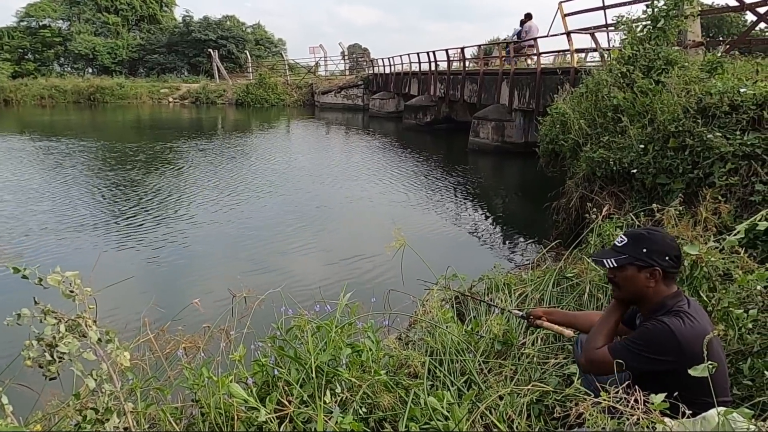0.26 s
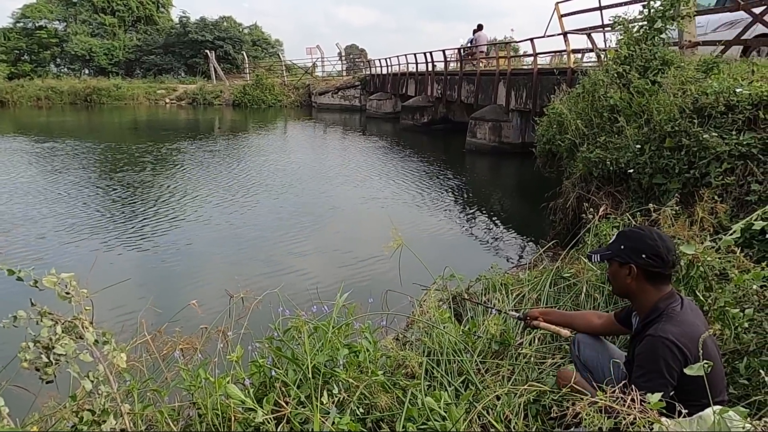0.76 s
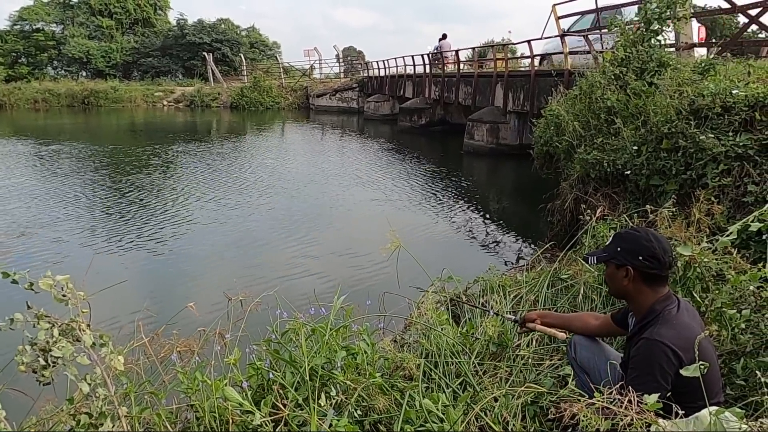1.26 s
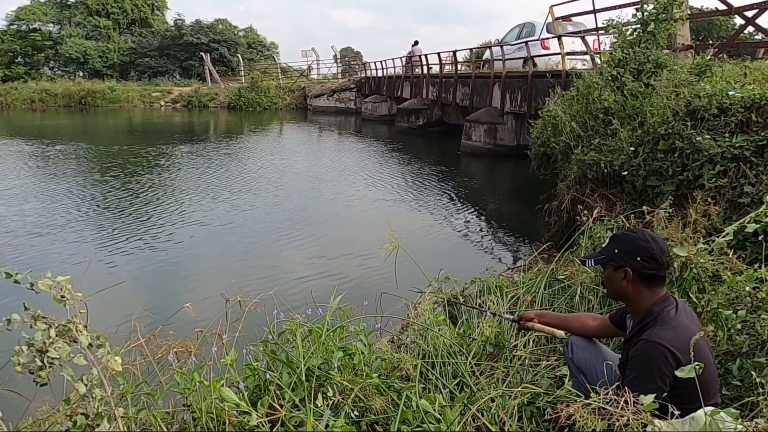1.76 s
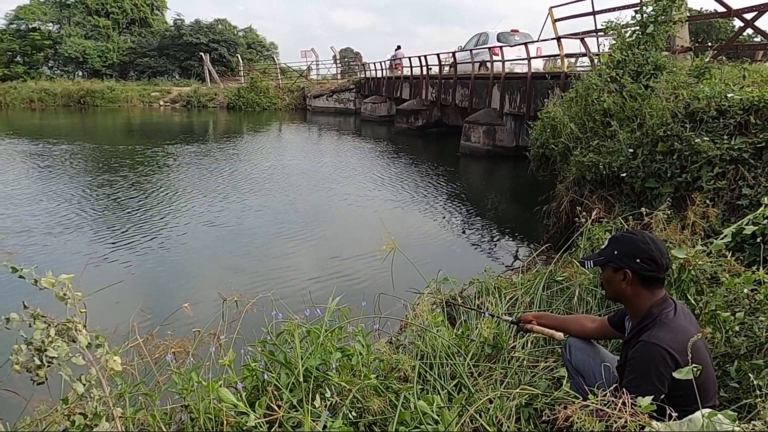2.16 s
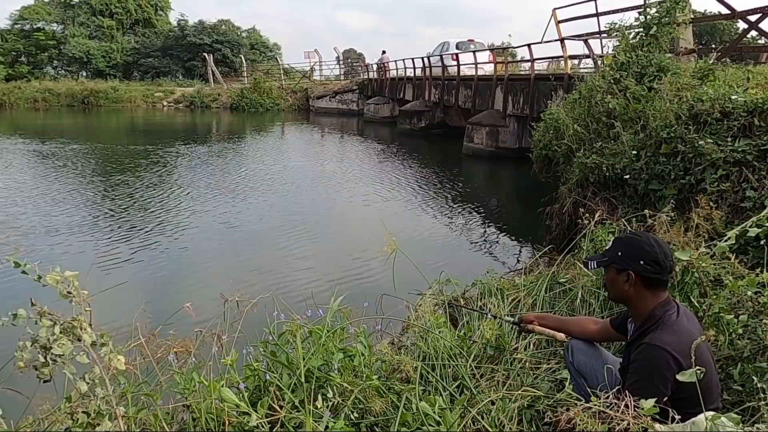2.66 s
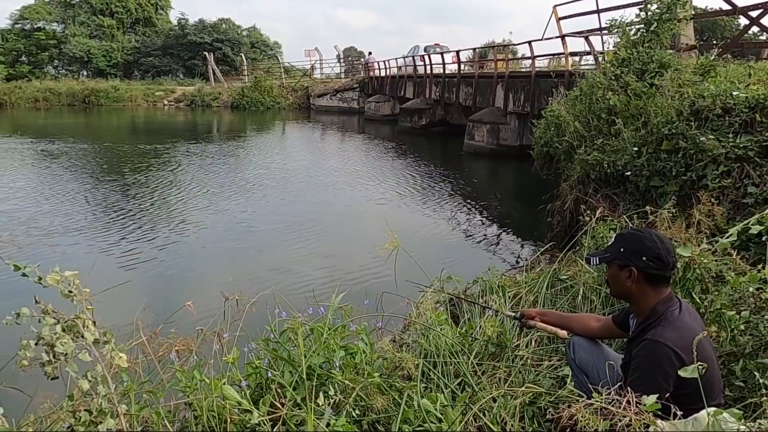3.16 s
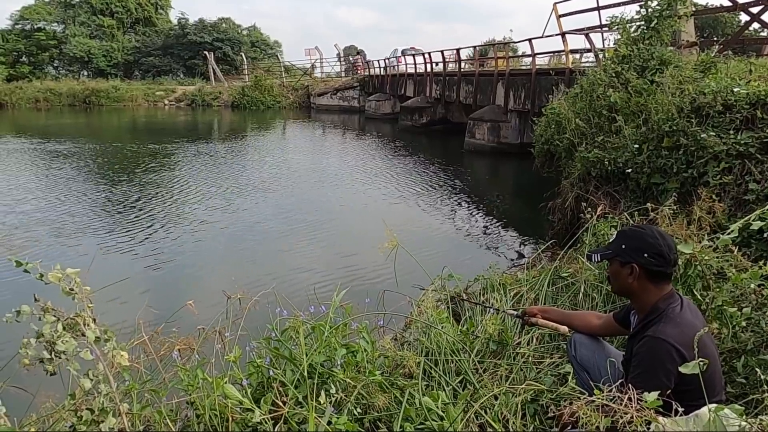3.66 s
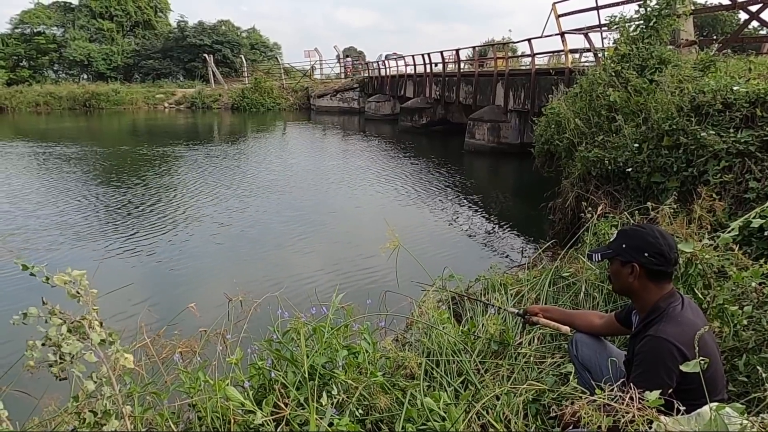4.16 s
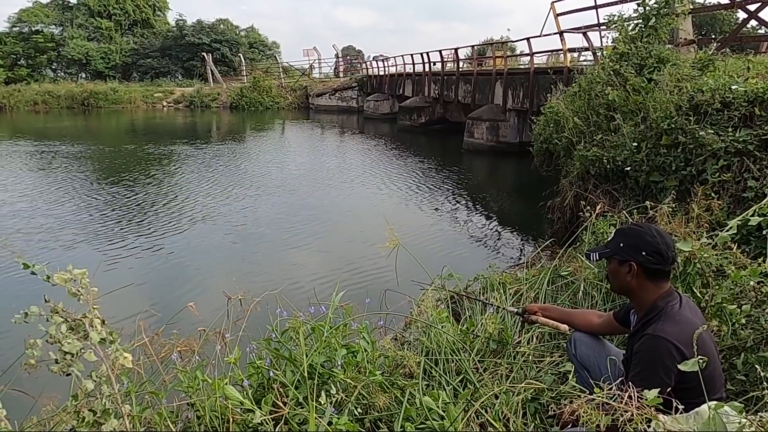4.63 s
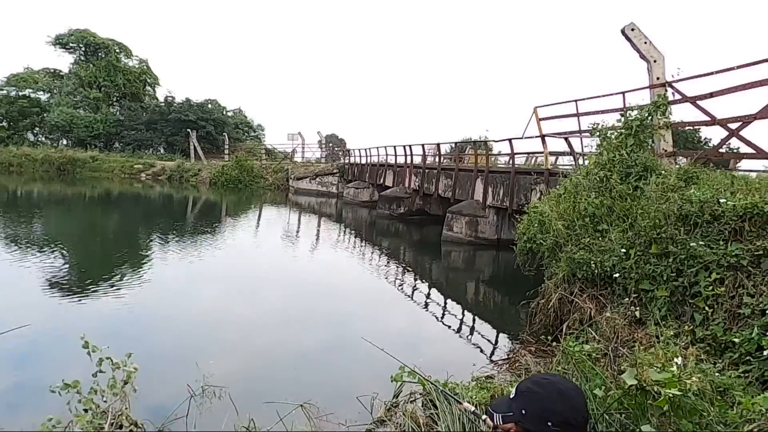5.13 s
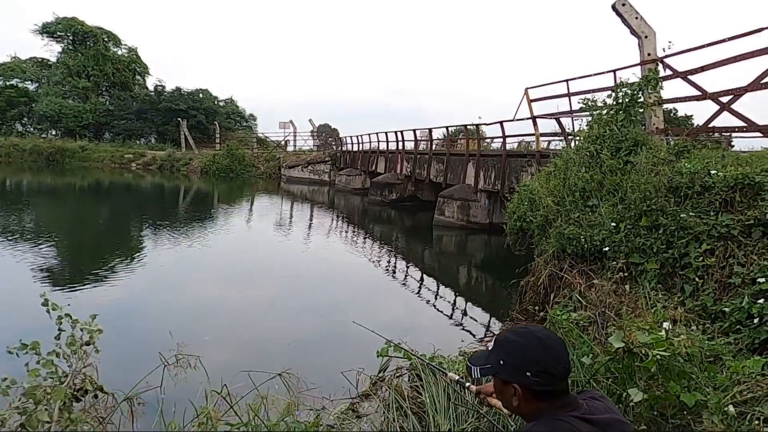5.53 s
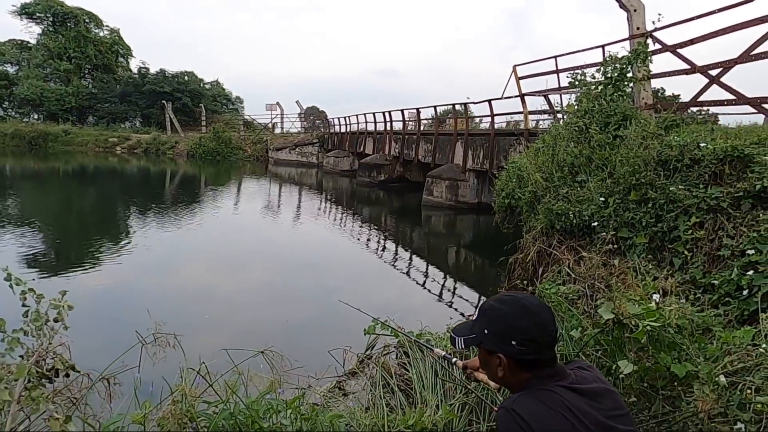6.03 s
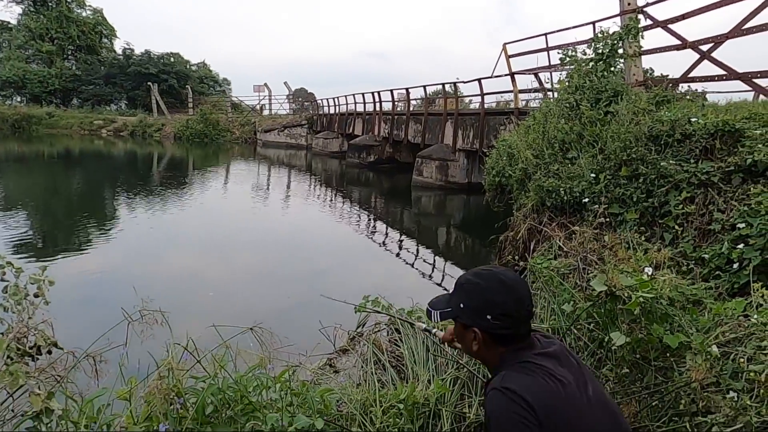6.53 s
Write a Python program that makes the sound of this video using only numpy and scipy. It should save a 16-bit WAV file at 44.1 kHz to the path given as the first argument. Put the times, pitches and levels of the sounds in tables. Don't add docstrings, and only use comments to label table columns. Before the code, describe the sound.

A car revs and drives off over a bridge with tyre roar and wind buffeting, brief silence, then a motorcycle putters past amid insects.

```python
import sys
import numpy as np
from scipy import signal
from scipy.fft import rfft, irfft, next_fast_len
from scipy.io import wavfile
from scipy.ndimage import uniform_filter1d

SR = 44100
rng = np.random.default_rng(int(sys.argv[2]) if len(sys.argv) > 2 else 0)


def master(y):
    cut = np.clip(np.atleast_2d(y).T, -1, 1)
    pcm = np.round(cut * 32767)
    wavfile.write(sys.argv[1], SR, pcm.astype(np.int16))


def linear_from_db(decibels):
    return 10 ** (np.asarray(decibels, float) / 20)


N = 299439
T = np.arange(N) / SR
CUT_S, BACK_S, FADE_IN_S = 4.9805, 5.185, 0.066

# time in seconds, firing rate in Hz, load in dB.
CAR_ENGINE = [(0, 27.76, -34), (.5, 28.19, -32), (1.26, 28.63, -34), (1.35, 37.3, -29.5), (1.5, 40.84, -28),
              (1.77, 42.94, -23.5), (2.28, 44.33, -23.5), (2.44, 42.07, -32.5), (2.62, 39.42, -31.5),
              (2.8, 39.2, -34.5), (3.07, 39.25, -32), (3.61, 42.12, -31), (4.3, 44.48, -32.5),
              (4.66, 46.01, -36), (4.97, 45.05, -33)]
# frequency in Hz, gain in dB.
EXHAUST_RESPONSE = [(28, -4.5), (43, -0.5), (56, -5), (85, -3.5), (130, -24)]
DULLING_DB_PER_S = -0.52

DIESEL_HZ = 26.04
# level in dB, start of receding in seconds, slope in dB per second.
DIESEL_FADE = (-38, 1.21, -3.5)
# multiple of the firing rate, level in dB.
DIESEL_MULTIPLES = [(2, -1.5), (4, -4), (5, -5.5), (6, -2.5), (7, -8), (8, -16), (9, -17.5)]

# time in seconds, roar in dB, distance from 0 to 1, port spread from 0 to 1.
ROAD_PASS = [(0, -47.5, 0.01, 0), (1.2, -49, 0.24, 0.08), (2, -47, 0.55, .16), (2.6, -48.5, 0.7, .17),
             (3.2, -49, 0.9, 0.19), (4.3, -51.5, 0.75, 0.2), (4.62, -51.5, 0.78, 0.1),
             (4.97, -53, 0.6, 0.02)]
# frequency in Hz, density in dB per Hz.
NEAR_ROAR = [(140, -33), (230, -10.5), (330, -10.5), (460, -3.5), (700, -10), (1050, -9.5), (1350, -12.5),
             (1700, -15), (2000, -20), (4080, -24), (7400, -39), (8800, -34), (10000, -46.5), (16000, -75)]
# frequency in Hz, density in dB per Hz.
FAR_ROAR = [(200, -10.5), (330, -22), (470, 3), (600, -8), (760, -22), (1020, 1), (1270, -14), (1610, -7),
            (1880, -17), (2250, -13), (3000, -20.5), (5000, -29.5), (7200, -42), (9500, -45)]
# frequency in Hz, factor on the spread.
ROAR_WIDTH = [(60, .3), (500, 0.54), (1500, 1.3), (5000, 2.3), (10000, 7.6)]
PORT_LAG_S = 1e-4
# frequency in Hz, density in dB per Hz.
BODY_RUMBLE = [(15, -24), (30, -0.5), (70, 1), (150, -3.5), (220, -9.5), (300, -19), (500, -53)]
RUMBLE_NEAR_DB, RUMBLE_FAR_DB, RUMBLE_GONE_S = -31.5, -41, 0.49
# time on the deck in seconds, half width in seconds, level there in dB, level elsewhere in dB.
TREAD_HUM = (2.9, .55, -55, -68)

# frequency in Hz, density in dB per Hz.
PORT_HISS = [(8000, -40.5), (9800, -2.5), (11000, -3.5), (12500, 4.5), (14000, -1), (15500, -10),
             (16500, -45)]
# start in dB, slope in dB per second.
HISS_FADE = (-84.5, -6.5)
# frequency in Hz, width in Hz, level in dB.
ELECTRONIC_WHINE = (12290, 50, -96)

# centre in seconds, half width in seconds, buffeting in dB, flutter relative to it in dB.
GUSTS = [(.77, 0.069, -56, -32.5), (1.28, 0.052, -55, -27), (1.87, 0.3, -44.5, -24),
         (2.43, 0.024, -31, -19), (2.56, .04, -30, -26), (2.68, 0.074, -42, -24), (2.88, 0.071, -32, -10),
         (3.2, 0.29, -49.5, -16), (3.6, 0.097, -28, -13.5), (3.85, .15, -35, -24), (4.15, 0.19, -38, -25.5),
         (4.38, 0.049, -22.5, 3.5), (4.51, .07, -24.5, -4.5), (4.95, 0.082, -33, -16)]
# frequency in Hz, density in dB per Hz.
BUFFET_COLOUR = [(12, -1), (30, 3.5), (70, 4.5), (140, -10.5), (250, -21.5), (500, -75.5)]
# frequency in Hz, density in dB per Hz.
FLUTTER_COLOUR = [(80, -26), (170, 9.5), (280, -6), (450, -11.5), (800, -29.5), (1300, -50), (2500, -86)]
FLUTTER_LEFT_DB = -24
# time in seconds, peak in dB, pitch in Hz, cycles, port (0 left, 1 right).
EDDIES = [(4.322, -12.5, 75, 0.54, 0), (4.364, -13, 90.52, 0.75, 0), (4.338, -24, 716, 1.7, 1),
          (4.339, -10.5, 338, 1, 1), (4.344, -8.5, 55, 1.4, 1), (4.362, -15, 148, 1.1, 1),
          (4.368, -10.5, 65, 1.3, 1), (4.38, -8.5, 286, 3.9, 1), (4.384, -26.5, 740, 5, 1),
          (4.392, -17, 494, 2.7, 1), (4.402, -17, 201, 2.9, 1), (4.421, -15, 120, 1.7, 1),
          (4.444, -28.5, 290, 4.4, 1), (4.473, -22, 270, 5.8, 1), (4.496, -9, 197, 0.84, 1),
          (4.5, -28, 505, 2.1, 1), (4.541, -17, 250, 1.1, 1), (4.559, -16.5, 91.95, 1.4, 1),
          (4.958, -26, 130, 4.7, 0), (4.957, -27, 128.6, 6.3, 1)]

# time in seconds, peak in dB, crack in Hz, tube ring in dB, tube ring in Hz.
ROD_KNOCKS = [(4.586, -45.5, 3600, -70, 2290), (5.232, -43, 4500, -69, 2300), (5.253, -50, 4000, -66, 2300),
              (5.2645, -65, 1500, -35, 690), (5.2702, -36.5, 3800, -31, 683), (5.282, -46, 3500, -39, 2340),
              (5.2865, -33, 4800, -27, 818), (5.295, -45, 3900, -70, 2300), (5.3344, -31, 3800, -33, 2245),
              (6.6575, -39, 4800, -70, 2290), (6.713, -52.5, 4200, -62, 1800),
              (6.726, -51.5, 11000, -50, 1750), (6.745, -58.5, 1500, -52, 1200),
              (6.76, -53, 8500, -54, 1300), (6.78, -60, 5000, -50, 2380)]
# centre in seconds, half width in seconds, level in dB.
GRASS_RUSTLES = [
    (5.24, .02, -58),
    (5.28, .015, -46),
    (5.315, .02, -58),
    (5.339, .009, -43.5),
    (6.675, .018, -58),
    (6.725, .035, -54.5),
    (6.765, .022, -55),
]
# frequency in Hz, density in dB per Hz.
GRASS_COLOUR = [(600, -20), (1500, 8.5), (2500, 3.5), (4500, 0.5), (8000, -10.5), (11000, -17),
                (15000, -29.5)]
# centre in seconds, half width in seconds, level in dB.
CLOTH_BRUSH = (6.72, .07, -68)

# rumble in dB, share following the motorcycle, wash at the start in dB, wash slope in dB per second.
BANK_LEVELS = (-36.5, .45, -52, -7.5)
# frequency in Hz, density in dB per Hz.
TRAFFIC_RUMBLE = [(15, -29.5), (35, 5.5), (70, 8.5), (130, 5), (220, -3), (330, -11), (500, -65)]
# frequency in Hz, density in dB per Hz.
AIR_WASH = [(180, -12), (300, -0.5), (500, 2.5), (890, -11), (1200, -14), (2150, -21), (3300, -32),
            (5400, -33), (8000, -35.5), (9500, -53.5), (11000, -66), (15500, -84)]
# frequency in Hz, density in dB per Hz.
INSECT_CHORUS = [(4800, -28), (5700, -9.5), (6500, 0.5), (7200, -0.5), (7700, -19), (8500, -10.5),
                 (9300, -27)]
CHORUS_DB = -71

# time in seconds, firings per second.
MOTORCYCLE_FIRINGS = [
    (5.2067, 15.597),
    (5.35, 15.874),
    (5.65, 16.949),
    (5.8, 15.605),
    (5.95, 15.152),
    (6.3, 10.765),
    (6.8, 6.944),
]
# frequency in Hz, level in dB, 60 dB decay in seconds.
PIPE_MODES = [(106.5, -2.5, 0.22), (217, -9, 0.29), (311.2, -10.5, 0.13), (130, -5, 0.089)]
# level in dB, last hard pull in seconds, its half width in seconds, its level in dB.
SILENCER_SHELL = (-57.5, 5.6, .12, -56)
NEAREST_S, PASS_S = 5.45, .5
THROTTLE_OFF_S = 5.79
FIRING_DB, COASTING_DB, UNEVEN_DB = -17, -13.5, .8
CLOSING_DB = -7

# pitch in Hz, pulse in seconds, first and last in seconds, interval in seconds, level in dB.
CRICKET_SONGS = [
    (7450, .03, 5.321, 5.61, .143, -67),
    (7450, .03, 6.02, 6.72, .1393, -69.5),
    (7720, .02, 5.673, 6.09, .1385, -74.5),
]
PAIR_GAP_S = .037
# start in seconds, length in seconds, level in dB, starting pitch in Hz.
CICADA_CALLS = [
    (5.42, .28, -65, 4650),
    (5.7, .12, -79, 4700),
    (5.98, .41, -69, 4400),
    (6.565, .09, -73, 4560),
]
CICADA_RISE_HZ_PER_S, CICADA_TOP_HZ = 2000, 4900

# frequency in Hz, gain in dB.
MICROPHONE_RESPONSE = [(20, 0), (9200, -1.5), (10300, -12.5), (12000, -19.5), (16000, -21.5)]


def evened(x):
    return x / np.sqrt(np.mean(x ** 2) + 1e-20)


def read(points, hz):
    f, value = np.transpose(points)
    return np.interp(np.log(hz + 1), np.log(f + 1), value)


def columns(rows, t=T):
    s, *values = np.transpose(rows)
    return [np.interp(t, s, v) for v in values]


def add(mix, s, sound):
    part = mix[round(s * SR):][:len(sound)]
    part += sound[:len(part)]


def wander(hz):
    t = T[::16]
    rates = np.geomspace(hz / 12, hz, 10)
    drift = sum(np.sin(2 * np.pi * (f * t + rng.random())) / f ** .3 for f in rates)
    return np.interp(T, t, evened(drift))


def coloured(spectrum):
    size = next_fast_len(N)
    gain = linear_from_db(read(spectrum, np.fft.rfftfreq(size, 1 / SR)))
    noise = irfft(rfft(rng.standard_normal(size)) * gain, size)
    return evened(noise[:N])


def resonate(x, hz, width):
    turn = np.exp(2j * np.pi * np.cumsum(hz * np.ones(len(x))) / SR)
    r = np.exp(-np.pi * width / SR)
    return 2 * (turn * signal.lfilter([1 - r], [1, -r], x / turn)).real


def swell(s, half, db):
    return linear_from_db(db) * np.exp(-((T - s) / half) ** 2)


def car():
    hz, load_db = columns(CAR_ENGINE)
    turns = np.cumsum(hz * (1 + .008 * wander(9.01))) / SR
    out = np.zeros(N)
    for k in range(3):
        pipe_db = read(EXHAUST_RESPONSE, (k + 1) * hz)
        level_db = load_db + pipe_db + DULLING_DB_PER_S * k * T + 1.3 * wander(16)
        out += np.sqrt(2) * linear_from_db(level_db) * np.cos(2 * np.pi * (k + 1) * turns - 0.67 * k)
    return out


def diesel():
    start_db, recede_s, slope_db = DIESEL_FADE
    turns = np.cumsum(DIESEL_HZ * (1 + 0.0053 * wander(3.02))) / SR
    hum = np.zeros(N)
    for multiple, db in DIESEL_MULTIPLES:
        fading = linear_from_db(1.3 * wander(9))
        hum += linear_from_db(db) * fading * np.cos(2 * np.pi * (round(multiple) * turns + rng.random()))
    return np.sqrt(2) * linear_from_db(start_db + slope_db * np.maximum(T - recede_s, 0)) * hum


def tyre_roar():
    frames, hz = N // 128 + 5, np.fft.rfftfreq(512, 1 / SR)
    roar_db, far, spread = columns(ROAD_PASS, np.arange(frames) * 128 / SR)
    a, b, c, d, patches = rng.standard_normal((frames, 257, 5)).T
    patches = uniform_filter1d(patches, size=6, axis=0)
    patches = evened(uniform_filter1d(patches, size=16, axis=1))
    flicker = evened(uniform_filter1d(rng.standard_normal(frames), size=4))

    far = np.clip(far, 0, 1)
    colour = linear_from_db(np.outer(read(NEAR_ROAR, hz), 1 - far) + np.outer(read(FAR_ROAR, hz), far))
    band = (hz > 900) & (hz < 3000)
    colour = colour / np.sqrt((colour[band] ** 2).sum(0))
    colour = colour * linear_from_db(roar_db + 1.32 * patches + 0.68 * flicker)

    mid = a + 1j * b
    side = (c + 1j * d) * np.clip(np.outer(read(ROAR_WIDTH, hz), spread), 0, 1)
    lag = np.tan(np.pi * PORT_LAG_S * np.outer(hz, np.clip(spread, 0, .3)))
    side = side - 1j * mid * lag
    ports = np.array([mid + side, mid - side]) * colour
    return signal.istft(ports, nperseg=512, noverlap=384)[1][:, :N]


def road():
    rumble_gain = linear_from_db(RUMBLE_FAR_DB) + linear_from_db(RUMBLE_NEAR_DB) * np.exp(-T / RUMBLE_GONE_S)
    rumble = rumble_gain * linear_from_db(1.6 * wander(20)) * coloured(BODY_RUMBLE)
    hum = resonate(resonate(rng.standard_normal(N), 1080, 260), 1080, 260)
    tread = (swell(*TREAD_HUM[:3]) + linear_from_db(TREAD_HUM[3])) * evened(hum)
    return linear_from_db(2.5) * tyre_roar() + rumble + tread


def air():
    start_db, slope_db = HISS_FADE
    hiss_gain = linear_from_db(start_db + slope_db * T + 2.5 * wander(40))
    hiss = hiss_gain * np.array([coloured(PORT_HISS) for port in "LR"])
    hz, width, db = ELECTRONIC_WHINE
    whine = linear_from_db(db + 1.5 * wander(6)) * evened(resonate(rng.standard_normal(N), hz, width))
    return hiss + linear_from_db([[-6], [3]]) * whine


def wind():
    strength = sum(swell(s, half, db) for s, half, db, _ in GUSTS)
    quick = sum(swell(s, half, db + extra_db) for s, half, db, extra_db in GUSTS)

    def lumps(hz):
        return np.clip(1 + .45 * wander(hz), .25, 1.7)

    buffet = np.array([strength * lumps(40) * coloured(BUFFET_COLOUR) for port in "LR"])
    flutter = np.array([quick * lumps(80) * coloured(FLUTTER_COLOUR) for port in "LR"])
    return 1.02 * buffet + 0.86 * linear_from_db([[FLUTTER_LEFT_DB], [0]]) * flutter


def slaps():
    out = np.zeros((2, N))
    for (s, db, hz, cycles, port), chance in zip(EDDIES, rng.random((len(EDDIES), 2))):
        t = np.arange(-cycles / hz, cycles / hz, 1 / SR)
        u = t * hz / cycles
        glide = 1 + .2 * (chance[0] - .5) * u
        slap = np.exp(-4.5 * u ** 2) * np.cos(2 * np.pi * hz * glide * t)
        add(out[round(port)], s + t[0], linear_from_db(db) * slap)
    return out


def rod():
    out, t = np.zeros(N), np.arange(0, .06, 1 / SR)
    noises = rng.standard_normal((len(ROD_KNOCKS), len(t)))
    for (s, db, hz, ring_db, ring_hz), noise in zip(ROD_KNOCKS, noises):
        burst = noise * np.exp(-t / .0014)
        snap = np.diff(noise * np.exp(-t / .0004), prepend=0)
        crack = resonate(resonate(burst, hz, 0.48 * hz), hz, 0.48 * hz) + .2 * snap
        ring = linear_from_db(ring_db - 60 * t / 0.05) * (1 - np.exp(-t / 0.00032)) * np.sin(2 * np.pi * ring_hz * t)
        add(out, s, 1.8 * linear_from_db(db) * crack / abs(crack).max() + ring)
    grass = coloured(GRASS_COLOUR) * linear_from_db(2.5 * wander(300)) * sum(swell(*row) for row in GRASS_RUSTLES)
    cloth = swell(*CLOTH_BRUSH) * linear_from_db(3 * wander(150)) * coloured(PORT_HISS)
    return out + grass + cloth


def passing_db(t):
    return -10 * np.log10(1 + ((t - NEAREST_S) / PASS_S) ** 2)


def bank():
    rumble_db, share, start_db, slope_db = BANK_LEVELS
    low_db = rumble_db + share * passing_db(T) + 1.5 * wander(25)
    wash_db = start_db + slope_db * (T - BACK_S) + 6.5 + .7 * wander(60)
    low = linear_from_db(low_db) * coloured(TRAFFIC_RUMBLE)
    wash = linear_from_db(wash_db) * coloured(AIR_WASH)
    chorus = linear_from_db(CHORUS_DB + 1.1 * wander(40)) * coloured(INSECT_CHORUS)
    return low + wash + chorus


def push(u):
    return -1.65 * u * np.exp(-u ** 2 / 2)


def pipe_ring(t, detune):
    trough = t - .0027
    ring = np.zeros(len(t))
    for hz, level_db, t60 in PIPE_MODES:
        decay = linear_from_db(level_db - 60 * np.maximum(trough, 0) / t60)
        ring -= decay * np.cos(2 * np.pi * hz * detune * trough + 0.52)
    return ring * np.sin(np.pi / 2 * np.clip((t + .0035) / .005, 0, 1)) ** 2


def silencer(beat):
    hz = 978 * (1 + 0.012 * wander(60))
    tone = np.sqrt(2) * linear_from_db(1.8 * wander(30)) * np.cos(2 * np.pi * np.cumsum(hz) / SR)
    shell = .8 * tone + .6 * evened(resonate(rng.standard_normal(N), 985, 90))
    jet = evened(resonate(resonate(rng.standard_normal(N), 1800, 1100), 1500, 1100)) * beat
    gain = linear_from_db(SILENCER_SHELL[0] + .4 * passing_db(T)) + swell(*SILENCER_SHELL[1:])
    return gain * (shell * (.55 + 1.05 * beat) + linear_from_db(-6) * jet)


def motorcycle():
    out, beat, t = np.zeros(N), np.zeros(N), np.arange(-.008, .12, 1 / SR)
    rate = columns(MOTORCYCLE_FIRINGS)[0] * (T >= MOTORCYCLE_FIRINGS[0][0])
    turns = np.cumsum(rate) / SR
    times = np.interp(np.arange(int(turns[-1]) + 1) + 1e-4, turns, T)
    for s, gap, chance in zip(times, np.gradient(times), rng.standard_normal((len(times), 3))):
        if s < THROTTLE_OFF_S:
            share, db = .9, FIRING_DB + 1.9 * passing_db(s)
        else:
            share, db = .04, COASTING_DB + 1.93 * passing_db(s)
            db += CLOSING_DB * (s < THROTTLE_OFF_S + gap)
        db += UNEVEN_DB * chance[2]
        ring = pipe_ring(t, 1 + 0.013 * chance[0])
        pull = 0.94 * ring + 0.2 * push((t - .0013) / 0.002) + 0.5 * push((t - .009) / 0.0047)
        coast = push((t - .0017) / 0.0022) + 0.55 * push((t - 0.24 * gap - .002) / 0.0027)
        coast += 0.25 * chance[1] * push((t - 0.6 * gap) / 0.0016) + 0.21 * ring
        add(out, s + t[0], linear_from_db(db) * (share * pull + (1 - share) * coast))
        add(beat, s, np.hanning(round(0.032 * SR)))
    return out + silencer(beat)


def crickets():
    out = np.zeros(N)
    for hz, length, first, last, every, db in CRICKET_SONGS:
        t = np.arange(0, length, 1 / SR)
        sag = 1.002 - .012 * (t / length) ** 3
        pulse = np.sin(2 * np.pi * np.cumsum(hz * sag) / SR) * signal.windows.tukey(len(t), .7)
        starts = np.arange(first, last + every / 2, every) - length / 2
        for s, chance in zip(starts, rng.standard_normal((8, 2))):
            add(out, s, linear_from_db(db + 3.0 + 1.5 * chance[0]) * pulse)
            add(out, s + PAIR_GAP_S, linear_from_db(db + 4.0 + 1.2 * chance[1]) * pulse)
    return out


def cicada():
    level, hz = np.zeros(N), np.full(N, 4600.)
    for s, length, db, start_hz in CICADA_CALLS:
        u = np.clip((T - s) / length, 0, 1)
        level += linear_from_db(db) * np.minimum(u / .55, 1) * np.minimum((1 - u) / .1, 1)
        climb = np.minimum(start_hz + CICADA_RISE_HZ_PER_S * (T - s), CICADA_TOP_HZ)
        hz = np.where(T > s, climb, hz)
    click_count = np.floor(np.cumsum(200 * (1 + 0.075 * wander(40))) / SR)
    clicks = np.diff(click_count, prepend=0) * linear_from_db(2.5 * rng.standard_normal(N))
    throb = np.cos(np.pi * np.cumsum(55 * (1 + .05 * wander(8))) / SR) ** 2
    drive = (evened(clicks) + .8 * rng.standard_normal(N)) * (.45 + throb)
    return level * evened(resonate(resonate(drive, hz, 650), hz, 600))


def scene():
    handling = rod()
    bridge = car() + diesel() + road() + wind() + slaps() + handling
    river = bank() + motorcycle() + crickets() + cicada() + handling
    fade_in = np.clip((T - BACK_S) / FADE_IN_S, 0, 1) ** 2
    return bridge * (T < CUT_S) + river * fade_in


def low_pass(x):
    return signal.sosfilt(signal.butter(12, 15700, fs=SR, output="sos"), x)


def record(dry):
    hz = np.linspace(0, SR / 2, 257)
    response = signal.firwin2(255, hz, linear_from_db(read(MICROPHONE_RESPONSE, hz)), fs=SR)
    dulled = signal.oaconvolve(dry, response[None], "same")
    mix = (dulled + air()) * (T < CUT_S) + dulled * (T > BACK_S)
    return low_pass(mix)


dry = scene()
out = record(dry)
master(out)
```